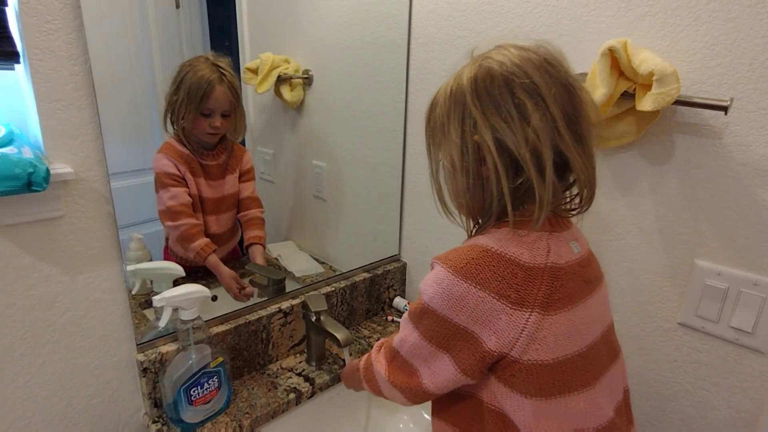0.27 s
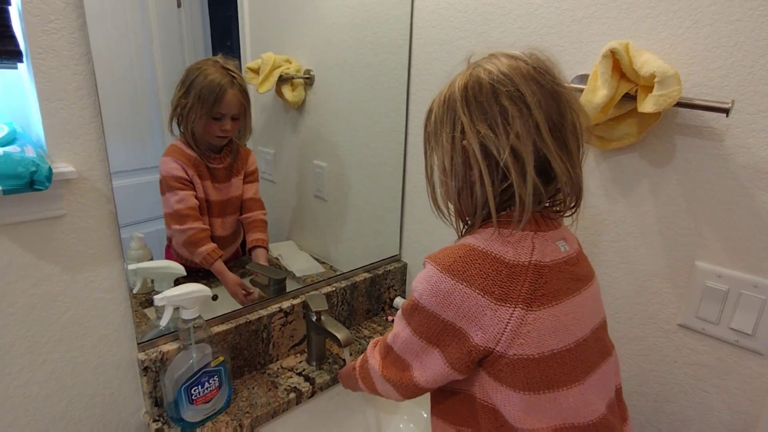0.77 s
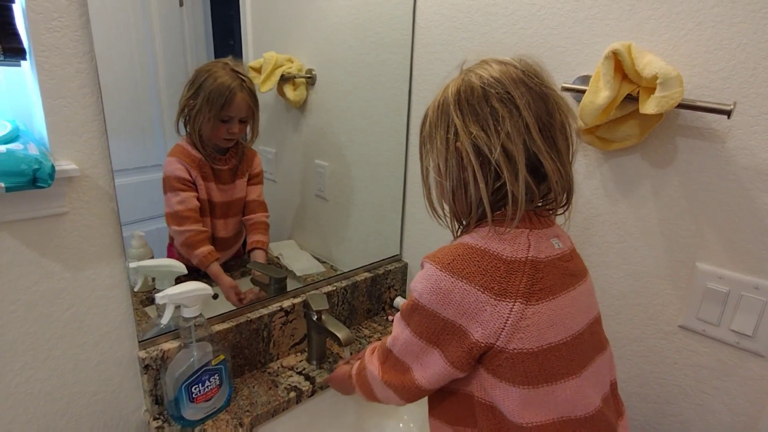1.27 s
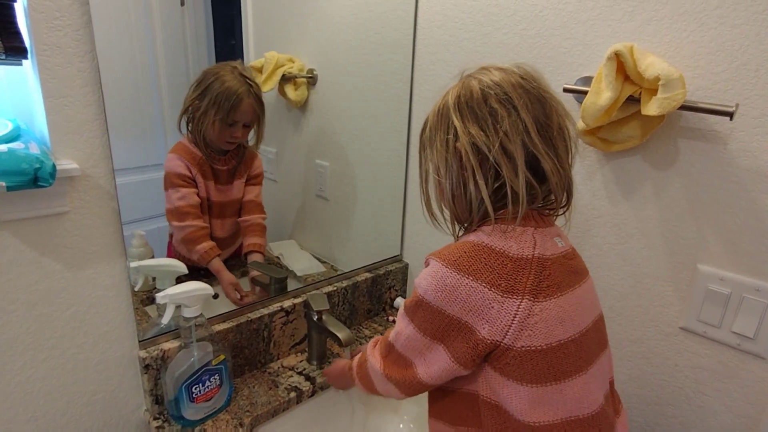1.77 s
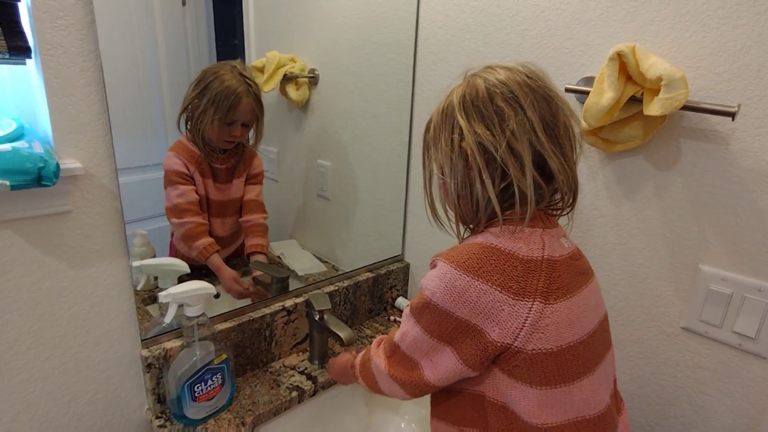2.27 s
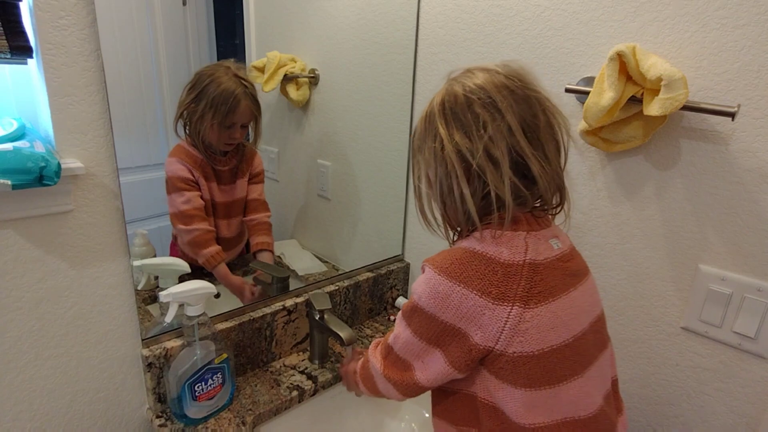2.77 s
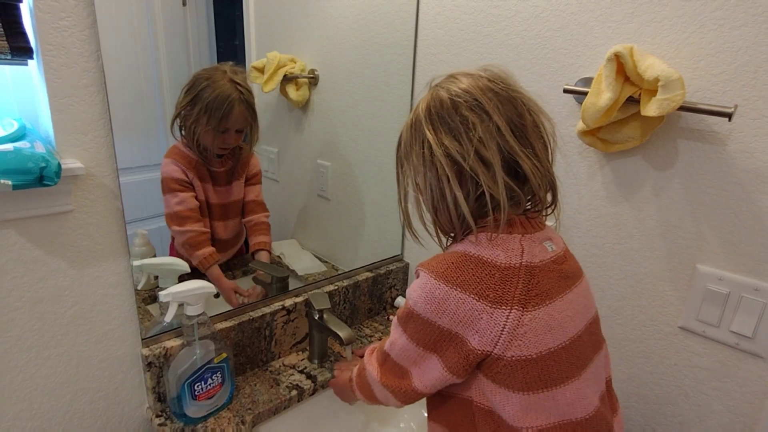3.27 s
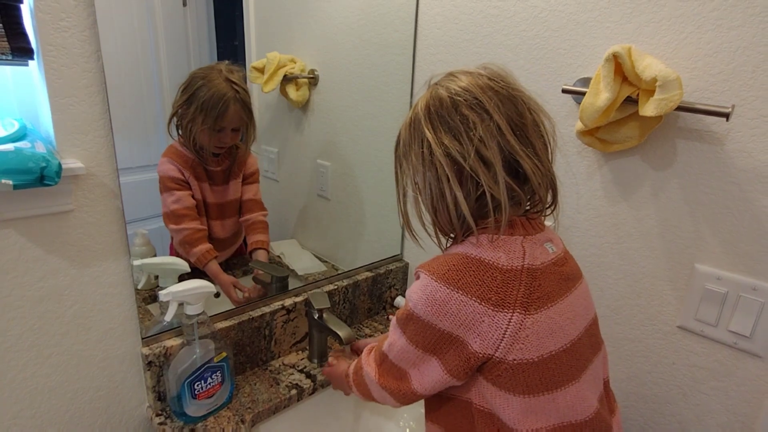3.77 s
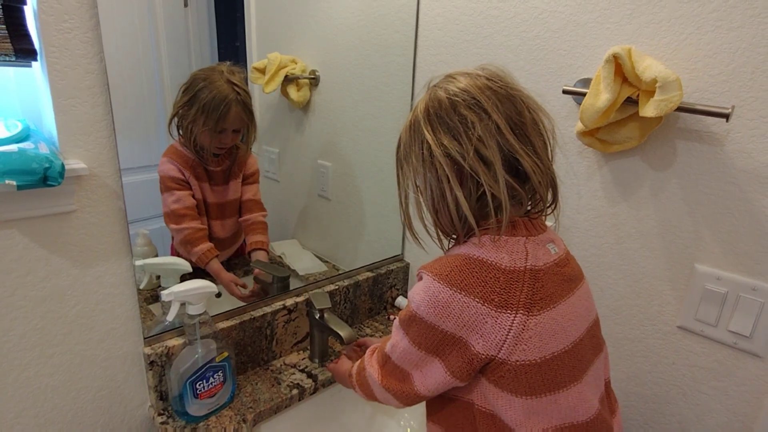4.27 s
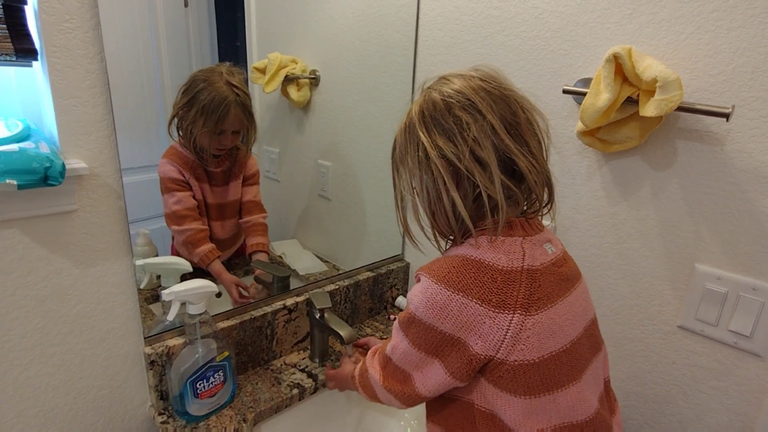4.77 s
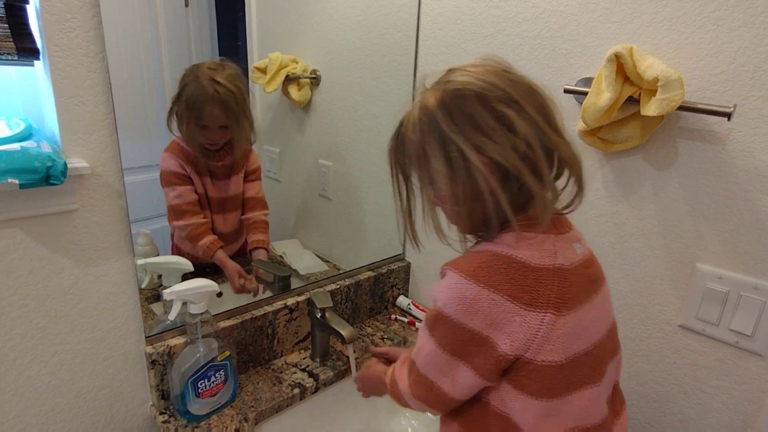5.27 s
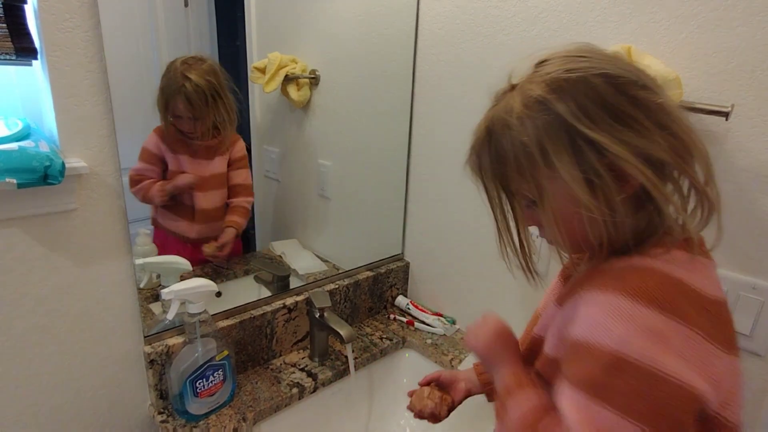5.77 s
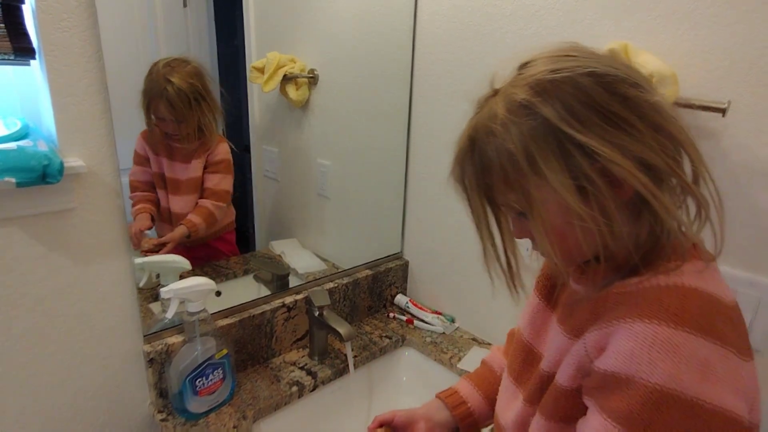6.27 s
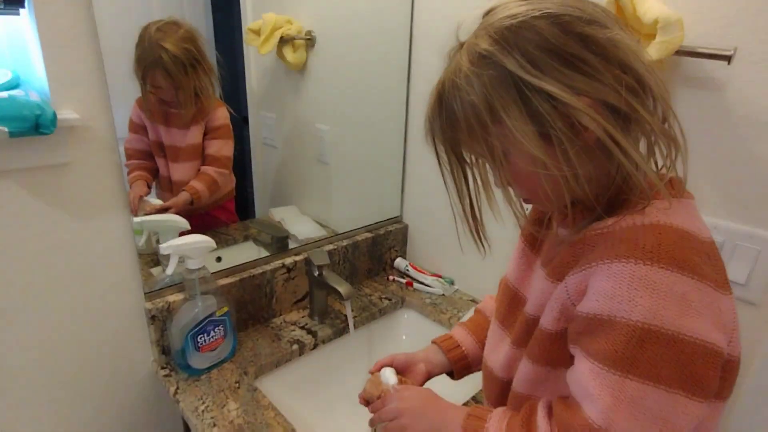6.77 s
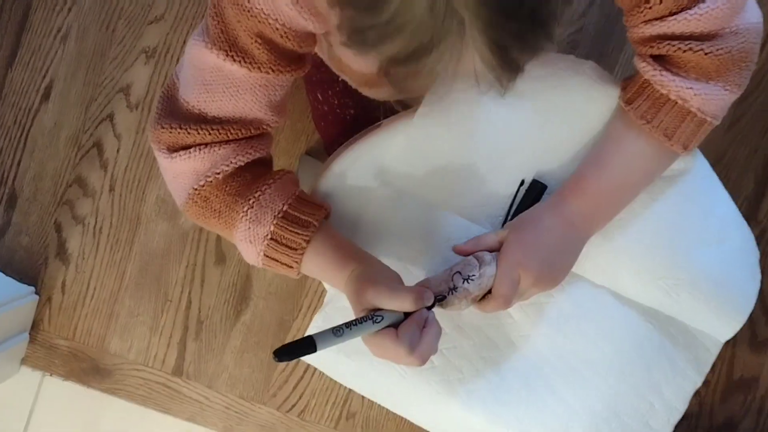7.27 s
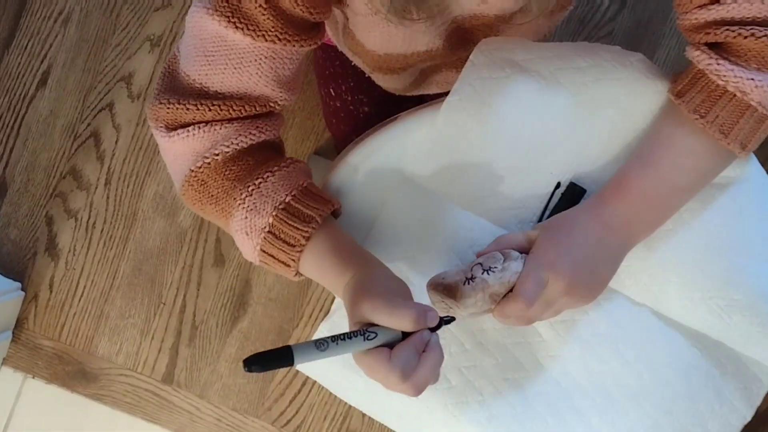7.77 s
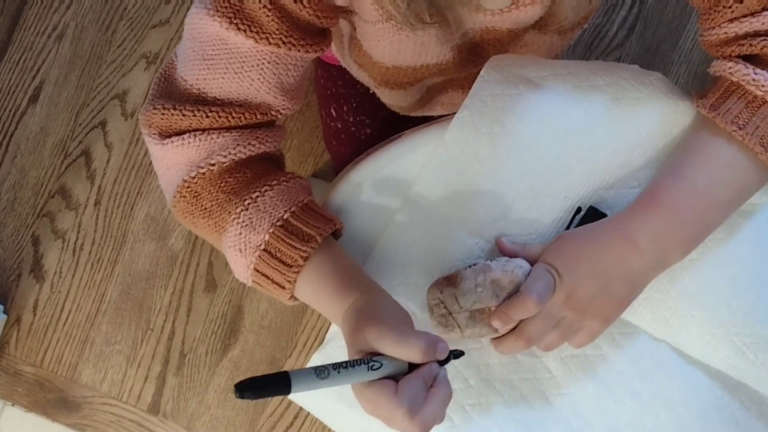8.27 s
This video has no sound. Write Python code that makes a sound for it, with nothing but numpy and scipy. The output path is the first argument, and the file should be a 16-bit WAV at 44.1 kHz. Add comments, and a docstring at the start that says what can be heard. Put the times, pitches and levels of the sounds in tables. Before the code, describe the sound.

From 0 s a bathroom tap runs close by, a fine fizzing jet drumming lightly on the basin. Until about 1.6 s water churns hollow and gurgling in cupped hands, with bubbly splashes near 0.2 and 0.7-0.9 s and dull knocks around 1 s. From 1.6 to 2.7 s it is thinner, with scattered plops; from 2.8 s splashes return, becoming dense and quick from 3.8 to 5.2 s. At about 5.5 s, with a bump, the hands leave and the jet strikes the bare basin: louder, brighter patter, sharp drop ticks and strong splashes, busiest with knocks at 6.3-6.5 s. A final splash and thump come near 7.1 s, where the water breaks off. Silence follows until a dull click at 7.5 s. Then a very quiet room: low mains hum, faint hiss, tiny taps near 7.6-7.85 s and a soft slide around 8.1 s, ending at 8.5 s.

```python
"""In a small bathroom a tap runs while a child rinses something in it. The jet fizzes, spills off the hands
in bubbly splashes and drums on the basin, then hits the bare basin with a bright patter, amid dull knocks.
The sound breaks off; after a silence a click opens onto a quiet room with a mains hum.
Water is built from random impacts, damped rising sine bubbles and shaped noise; the hum is two sines.
Knocks and taps are short dying bursts of shaped noise; each knock adds a dying sine."""
import sys
import numpy as np
from scipy import signal
from scipy.fft import rfft, irfft, next_fast_len
from scipy.io import wavfile
from scipy.ndimage import uniform_filter1d, map_coordinates

SR = 44100
rng = np.random.default_rng(int(sys.argv[2]) if len(sys.argv) > 2 else 0)


def file_out(sig):
    """Save sig as 16-bit WAV at sys.argv[1]."""
    # one column per channel
    cols = np.atleast_2d(sig).T
    # limit, then scale
    lim = np.clip(cols, -1, 1)
    pcm = np.round(lim * 32767).astype(np.int16)
    wavfile.write(sys.argv[1], SR, pcm)


N = 376173
TIME = np.arange(N) / SR  # seconds

# A t60 is the time a sound takes to fall by 60 dB.
# The quiet room's low rumble. Each row: frequency in Hz, strength in dB per Hz.
RUMBLE_SPECTRUM = [(25, -30), (38, -21), (50, -9), (70, 3), (110, -6.5), (200, -5.5), (300, -14),
                   (480, -15.5), (780, -18), (1100, -20), (2000, -33)]
# The faint hiss of its air. Each row: frequency in Hz, strength in dB per Hz.
AIR_SPECTRUM = [(200, -11), (700, -26), (1300, 9), (2200, 10), (4000, 3.5), (6500, -2.5), (10000, -8),
                (15500, -24)]
# How loud the hiss is. Each row: time in seconds, level in dB before the treble is changed.
AIR_LEVEL = [(7.5, -80.5), (7.57, -79.5), (7.63, -75), (7.82, -75.5), (7.95, -78.5), (8.15, -77.5),
             (8.28, -81.5), (8.5, -80.5)]
# How the hiss's treble is raised or lowered. Each row: time in seconds, change in dB.
AIR_TREBLE = [(7.5, 2), (7.7, 5), (8.15, 4), (8.27, -2), (8.5, 2)]
# How loud the mains hum is, before it wavers. Each row: time in seconds, level in dB.
HUM_LEVEL = [(7.5, -76), (7.7, -69), (7.74, -65.5), (8.53, -64.5)]
# Small sounds of handling at the table. Each row: start in seconds, level in dB, brightness in Hz,
# t60 in seconds.
TAPS = [(7.635, -66, 3000, 0.05), (7.723, -53, 130, 0.16), (7.776, -58, 2600, 0.03),
        (7.812, -70, 2500, .06), (7.847, -69, 3000, .03), (8.072, -69, 900, .12), (8.15, -67, 400, .2)]
# Something slides softly over the table. Each row: time in seconds, level in dB.
SLIDE_LEVEL = [(7.98, -95), (8.05, -75.5), (8.1, -77), (8.2, -80), (8.3, -100)]
# The colour of that slide. Each row: frequency in Hz, strength in dB per Hz.
SLIDE_SPECTRUM = [(300, -14), (520, -4), (680, -6), (850, 0), (1150, -5), (1600, -15), (4000, -30)]

# The bathroom walls. Each row: frequency in Hz, t60 of the echo in seconds.
WALLS = [(150, 0.67), (1000, 0.51), (4000, 0.15), (14000, 0.055)]
# How alike left and right are. Each row: frequency in Hz, likeness (1 is the same, 0 is unrelated).
ALIKE = [(60, 0.63), (250, 0.91), (600, 0.7), (900, 0.44), (1300, 0.1), (2000, 0.035), (2800, 0.27),
         (6000, -0.075), (15000, 0.07)]
# How the water leans to one side. Each row: frequency in Hz, left minus right in dB.
LEAN = [(100, 1), (600, 0), (1100, 1), (2000, -3), (3300, -1.5), (4300, 2), (5600, 4.5), (7000, 2),
        (8500, 0), (10500, -1.5), (12000, -0.5), (15000, -2)]

# Bumps against the basin and its cabinet. Each row: start in seconds, level in dB, brightness in Hz,
# t60 in seconds, panel boom level in dB, boom pitch in Hz.
KNOCKS = [(.25, -57, 599.7, .14, -63, 216), (0.791, -64, 150, 0.16, -63, 79.7),
          (0.9694, -48, 850, 0.1, -51, 213.4), (.987, -52, 650, 0.14, -50.5, 382),
          (5.496, -65, 900, 0.046, -58.5, 327), (5.531, -57, 1800, 0.11, -55, 206),
          (6.249, -62, 60, 0.95, -67.5, 60.3), (6.295, -38, 3200, 0.096, -46.5, 403),
          (6.319, -49.5, 1500, 0.18, -64, 62), (6.465, -51.5, 650, 0.19, -56.5, 70),
          (7.077, -43.5, 250, 0.17, -44.5, 177), (7.096, -50, 900, 0.098, -38.5, 172.5)]
# How the cabinet colours a bump. Each row: frequency in Hz, strength in dB.
CABINET = [(30, -35), (70, -23.5), (130, -6.5), (220, -14), (350, -2), (440, -7), (540, -10.5), (650, -6),
           (770, -4.5), (880, -2.5), (1050, -4), (1230, -11.5), (1700, -6.5), (1900, -7.5), (3000, -8.5),
           (8000, -19)]

# Water churning in the cupped hands. Each row: time in seconds, hollow sound in dB before a cut of 3.5 dB,
# its typical pitch in Hz, low gurgle in dB.
HOLLOW = [(0, -71, 995, -68), (.6, -76, 960, -72.5), (.93, -70.5, 930, -66.5), (1.03, -69, 905, -67.5),
          (1.25, -70.5, 825, -63.5), (1.44, -70, 766, -62.5), (1.52, -74.5, 800, -68.5),
          (1.9, -82, 728, -78)]
# Resonances of the low gurgle. Each row: frequency in Hz, width in Hz, strength in dB.
GURGLE_MODES = [(129.6, 4.5, 7), (204, 29, 1), (352.7, 15, 2), (423, 14, -0.5)]

# Handfuls of water that slap into the basin. Each row: start in seconds, reference level in dB,
# typical bubble pitch in Hz, pouring time in seconds, width in octaves (narrow plops, wide smacks).
SPLASHES = [(.227, -42, 2700, .012, 0.27), (.68, -44.5, 2550, .09, 0.41), (.786, -41, 2550, .025, .25),
            (.849, -43.5, 2550, .022, .3), (.913, -51.5, 2750, .018, .5), (1.269, -50, 2660, .09, .4),
            (1.532, -45.5, 3000, .003, 0.18), (1.868, -44, 2510, .007, 0.5),
            (1.888, -48.5, 3100, .003, 0.45), (2.355, -47.5, 3149, .025, 0.36),
            (2.727, -51, 2120, .006, 0.34), (2.81, -50.5, 3400, .015, .6), (2.858, -45, 2150, .01, 0.61),
            (2.875, -46.5, 3400, .012, .5), (2.905, -48, 1880, .004, 0.27), (2.95, -54, 2100, .12, .1),
            (3.092, -43.5, 2800, .012, 0.28), (3.163, -43.5, 3000, .022, .5), (3.23, -48.5, 2120, .005, .2),
            (3.314, -56, 3150, .003, 0.27), (3.401, -48, 3000, .06, .25), (3.75, -53.5, 3370, .004, 0.23),
            (3.777, -51, 2100, .012, 0.22), (3.813, -45.5, 3180, .028, 0.36),
            (3.905, -43.5, 2250, .003, 0.3), (3.954, -40.5, 3150, .006, 0.35),
            (3.983, -44.5, 2800, .005, .8), (4.003, -45, 3600, .012, 0.66), (4.057, -44, 1970, .008, .25),
            (4.113, -48, 3040, .004, 0.52), (4.136, -48.5, 4300, .004, 0.56), (4.15, -47.5, 2550, .03, .6),
            (4.179, -44.5, 3660, .025, 1.1), (4.246, -46.5, 2310, .008, 0.23),
            (4.279, -44, 2100, .01, 0.55), (4.313, -49, 3920, .01, .25), (4.375, -46.5, 2450, .055, 0.56),
            (4.466, -45.5, 2480, .03, 0.34), (4.497, -45, 3390, .006, 0.31),
            (4.517, -43.5, 2150, .022, 0.41), (4.564, -46.5, 3700, .012, 1.1),
            (4.616, -51.5, 1500, .003, .2), (4.643, -45.5, 2800, .017, 0.65),
            (4.69, -45.5, 2130, .006, 0.18), (4.722, -49, 2670, .01, .3), (4.907, -53, 1800, .003, 0.2),
            (4.912, -51.5, 3300, .003, .6), (5.001, -42, 2750, .007, 0.76), (5.058, -46, 3200, .004, 0.72),
            (5.087, -46, 3700, .008, .7), (5.112, -44.5, 3200, .006, 1.1), (5.173, -49.5, 5000, .003, .6),
            (5.205, -44, 3750, .018, 0.35), (5.48, -37, 2600, .004, 0.25), (5.498, -37.5, 3400, .025, 0.57),
            (5.535, -38, 3130, .03, 0.79), (5.585, -39.5, 3600, .012, 0.26), (5.69, -41, 2930, .035, 0.28),
            (5.834, -39.5, 3700, .013, 0.42), (5.955, -45.5, 4300, .01, 0.34),
            (6.094, -39, 3550, .02, 0.38), (6.149, -39, 3700, .02, 0.46), (6.297, -35.5, 3000, .012, 0.46),
            (6.325, -34, 3500, .012, 0.34), (6.338, -36, 4500, .025, 0.69), (6.382, -37.5, 3200, .012, .3),
            (6.41, -40, 3800, .02, .5), (6.464, -38, 3000, .015, 0.32), (6.49, -38, 3200, .025, 0.65),
            (6.573, -39.5, 3203, .02, 0.29), (6.863, -41.5, 3400, .005, .3), (6.908, -38, 4900, .042, .5),
            (7.048, -36.5, 3410, .047, 0.23)]
# Steady run-off from the hands. Each row: time in seconds, level in dB.
SPILL_LEVEL = [(0, -50), (.06, -60), (.35, -60.5), (.9, -58), (1.1, -65.5), (1.7, -67.5), (2.1, -66),
               (2.5, -61.5), (2.69, -66.5), (2.78, -60.5), (3.6, -64), (3.8, -58.5), (3.89, -62), (4, -58),
               (4.18, -57), (4.35, -59), (4.7, -60), (4.85, -62.5), (4.97, -61.5), (5.15, -58.5),
               (5.35, -64.5), (5.55, -56), (7.1, -60)]
# The wet spatter under the bubbles. Each row: frequency in Hz, strength in dB per Hz.
SPATTER_SPECTRUM = [(500, -14.5), (1000, -10), (1600, -9.5), (2150, -2), (2800, -3.5), (3500, 2),
                    (4500, -1), (5500, -3.5), (6700, -10.5), (10000, -37.5)]
# How the basin colours a splash. Each row: frequency in Hz, change in dB.
BOWL = [(900, -11), (1450, 0), (1800, -0.5), (2050, -0.5), (2400, 0), (2750, 1), (3050, -1.5), (3300, 2),
        (3900, 2), (4700, 3), (7000, 5.5)]
# How the cupped hands colour a splash. Each row: frequency in Hz, change in dB.
CUPPED = [(1100, 4), (1750, -12), (2350, 2), (2750, 4), (3400, 1), (4500, 1)]

# Spray thrown by the jet. Each row: time in seconds, amount in dB.
SPRAY = [(0.0, -55.5), (0.79, -54), (1.5, -63.5), (2.39, -64), (2.41, -60), (2.65, -64), (2.73, -62),
         (2.8, -58.5), (2.86, -59), (3.34, -56.5), (3.87, -61), (3.99, -65), (4.19, -62), (4.42, -64.5),
         (4.54, -57), (5.23, -62.5), (5.47, -56.5), (5.51, -54), (6.0, -51), (6.04, -50.5), (7.03, -50),
         (7.09, -50.5)]
# The jet's layers by name. Each entry: dB at the usual spray, dB gained per dB of spray,
# dB gained as the hands leave, dB gained as they draw clear.
JET_LAYERS = {"wash": (-56, 0.32, 5, 2), "patter": (-56.5, 1.67, -0.5, 2), "mist": (-51.5, 1, 1.5, -3)}
# The hands leave the stream. Each row: time in seconds, share of the jet that hits the bare basin.
BARE_SHARE = [(5.3, 0), (5.475, 0.098), (5.5, 0.95)]
# The jet drumming on the basin. Each row: time in seconds, level in dB.
DRUM_LEVEL = [(0, -66), (1.2, -66), (1.6, -65.5), (2.7, -66), (4.2, -65), (5.0, -64), (5.8, -61.5),
              (6.4, -59), (7.1, -60)]
# Basin resonances under the hands. Each row: frequency in Hz, width in Hz, strength in dB.
BASIN_MODES = [(88.5, 41, -9.5), (125, 14.2, -5), (188.5, 11, -1), (236, 45, 0.5), (268.3, 58, 0),
               (347.3, 15, -1.5), (513, 4.5, -4.5), (565.8, 6.7, 1), (557, 216, -13)]
# Basin resonances under the free jet. Each row: frequency in Hz, width in Hz, strength in dB.
BARE_BASIN_MODES = [(92, 32, -10.5), (202.5, 95, -1), (236.4, 59, 6), (260.7, 42, 4), (349.8, 12, 6.5),
                    (425, 11, -9), (494, 25, -9), (580, 60, -9), (910, 63, -28)]
# Standing waves in the empty bowl. Each row: frequency in Hz, width in Hz, strength in dB.
BARE_RING_MODES = [(2150, 90, -4), (2845, 140, 1.5), (3360, 180, -5), (3980, 84, -3), (4180, 64, 2.5),
                   (5440, 91, -12)]
# The wash of the jet on the hands. Each row: frequency in Hz, strength in dB per Hz.
WASH_SPECTRUM = [(200, -16), (900, -12), (1350, -1.5), (2000, -4), (3500, 1.5), (5300, 0.5), (6600, 1.5),
                 (8000, 2.5), (11500, -5.5), (15600, -5.5)]
# The wash on the bare basin. Each row: frequency in Hz, strength in dB per Hz.
BARE_WASH_SPECTRUM = [(200, -34.5), (900, -17), (1500, -17), (2300, -20.5), (3500, 3.5), (4600, -1),
                      (5600, 0), (6700, -8), (8000, 2), (11500, -6.5), (15600, -4)]
# The fine mist. Each row: frequency in Hz, strength in dB per Hz.
MIST_SPECTRUM = [(3000, -30.5), (6500, -16), (8000, -5), (11500, -.5), (12800, -0.5), (14000, 0),
                 (14900, -3.5), (15600, -4.5)]
# The patter at first. Each row: frequency in Hz, strength in dB per Hz.
PATTER_SPECTRUM = [(3000, -37), (6700, -7.5), (7600, 0.5), (8400, 1.5), (9800, 5.5), (10400, 1.5),
                   (11200, -7), (15000, -18.5)]
# The patter on the wet basin. Each row: frequency in Hz, strength in dB per Hz.
WET_PATTER_SPECTRUM = [(3000, -33), (7100, -9.5), (7800, -3.5), (8600, 6.5), (9900, 5.5), (10700, 1.5),
                       (11100, -11), (15000, -26)]
# The jet catches an edge and flicks out droplets. Each row: start in seconds, level in dB.
FLICKS = [(.2, -51), (2.39, -57), (2.51, -60), (3.16, -54), (3.81, -56), (4.19, -59)]
# Single fat drops that tick on the bare basin. Each row: peak time in seconds, level in dB.
TICKS = [(5.752, -41), (5.972, -45), (6.019, -37), (6.103, -41.5), (6.276, -41.5), (6.307, -41.5),
         (6.332, -35.5), (6.417, -34), (6.577, -38.5), (6.712, -43), (6.827, -41), (6.962, -40),
         (7.005, -36)]

BREAK_S, RESUME_S = 7.111, 7.505  # the bathroom breaks off; the quiet room opens
LOW_CUT_HZ, TOP_HZ = 34, 15650
LEFT_LEAD_S = .00008  # the basin lies a little to the left
RUMBLE_DB = -69.5
AIR_SPLIT_HZ = 5100  # where the hiss's treble begins
BOOM_T60 = 0.28  # seconds
RISE_S = 0.0033  # how fast a gush swells
OPENING_START_S, OPENING_END_S = 1.0, 1.6  # the cupped hands open
SPILL_HZ, SPILL_SPREAD = 3045, .25  # bubble pitch of the run-off and its log spread
GUSH_SPREAD, GUSH_T60 = 0.19, 0.15  # a handful's run-off: log spread of pitch, decay in seconds
FROTH_DB, SPATTER_DB = -13, -18  # what follows a handful, against its reference level
CLUMP_DB = 1.4  # how unevenly the run-off leaves the hands
BURST_S, BURST_CLIMB = .028, 0.33  # time a handful's bubbles take, log pitch gained on the way
BURST_SPREAD = 0.19  # log spread of their pitch per octave of width
SLAP_DB, SLAP_T60, SLAP_GRAINS_PER_S = -7, 0.035, 4200  # dB against the reference level, seconds, grain
USUAL_SPRAY_DB = -56.5
FLICK_HOLD_S, FLICK_T60, TICK_T60 = 0.027, 0.044, 0.022  # all in seconds
CLEAR_START_S, CLEAR_END_S = 5.5, 5.85  # the hands draw clear of the basin
WET_S = 5.9  # the patter's colour switches to that of the wet basin
SURGE_S, SURGE_DB, SURGE_T60 = 5.478, -53, 0.48  # the freed jet first lands hard on the basin
BARE_RING_DB = -9.5  # standing waves against the wash


def amp(db):
    """Turn decibels into a gain."""
    return 10 ** (np.asarray(db) / 20)


def unit(x):
    """Scale x to an average (rms) level of 1."""
    return x / np.sqrt(np.mean(x ** 2) + 1e-20)


def along(points, hz):
    """Read a table of (Hz, value) points at any frequency, on a log axis."""
    f, v = np.transpose(points)
    return np.interp(np.log(hz + 1), np.log(f + 1), v)


def curves(rows):
    """Give one value per sample for each column after the time."""
    s, *columns = np.transpose(rows)
    return [np.interp(TIME, s, column) for column in columns]


def level(rows):
    """Turn a table of times and dB into a gain for every sample."""
    return amp(curves(rows)[0])


def wobble(rate):
    """Draw a smooth random curve with `rate` knots a second."""
    knots = rng.standard_normal(int(N * rate / SR) + 4)
    return map_coordinates(knots, [TIME * rate])


def filtered(x, response):
    """Multiply the spectrum of x by a response that depends on frequency."""
    m = next_fast_len(N + SR // 2)
    hz = np.fft.rfftfreq(m, 1 / SR)
    return irfft(rfft(x, m) * response(hz), m)[..., :N]


def coloured(x, spectrum):
    """Shape x by a spectrum, at rms 1."""
    return unit(filtered(x, lambda hz: amp(along(spectrum, hz))))


def ringing(x, modes):
    """Send x through resonances that each ring around one pitch, at rms 1."""
    def response(f):
        total = 0
        for k, (centre, width, db) in enumerate(modes):
            resonance = 1j * f * width / (centre ** 2 - f ** 2 + 1j * f * width)
            total = total + (-1) ** k * amp(db) * resonance  # neighbours take opposite signs
        return total
    return unit(filtered(x, response))


def impacts(rate, size_db):
    """Make two streams of random impacts of uneven size, at rms 1; rate is hits per second."""
    chance = rng.random((2, N))
    sign, size = rng.standard_normal((2, 2, N))
    return unit((chance < rate / SR) * np.sign(sign) * amp(size_db * np.clip(size, -2.5, 2.5)))


def bubbles(s, hz, gain, cycles, rise):
    """A bubble is a damped sine that rises in pitch, with its own phase in each of two streams."""
    t = np.arange(SR // 60) / SR
    age = t * hz[:, None] / cycles
    phase = 2 * np.pi * cycles * (age + rise * (age - 1 + np.exp(-age)))
    body = gain[:, None] * np.exp(-3 * age) * (1 - np.exp(-30 * age))
    at = (np.abs(s[:, None] + t) * SR).astype(int).ravel()
    streams = []
    for offset in rng.uniform(0, 2 * np.pi, (len(s), 2)).T:
        sound = body * np.sin(phase + offset[:, None])
        streams.append(np.bincount(at, sound.ravel(), N)[:N])
    return np.array(streams)


def bathroom(x, wet_db, count=9):
    """Hard walls add a short dense tail, new for each of `count` stretches as the water moves about."""
    hz, t, z = signal.stft(rng.standard_normal((count, 2, SR // 4)), SR, nperseg=256)
    fade = amp(-60 * t / along(WALLS, hz)[:, None])
    tails = signal.istft(z * fade, SR, nperseg=256)[1]
    echo, step = np.zeros((2, N + SR)), N // count + 1
    for k, tail in enumerate(tails):
        stretch = x[:, k * step:(k + 1) * step]
        piece = signal.fftconvolve(stretch, tail / np.linalg.norm(tail[0]), axes=1)
        echo[:, k * step:][:, :piece.shape[1]] += piece
    return (x + amp(wet_db) * echo[:, :N]) / np.hypot(1, amp(wet_db))  # keeps the power about the same


def droplets(rate, size_db, wash_db, wet_db):
    """Single ticks lie over the smooth wash of countless smaller ones, echoed by the walls."""
    smooth = amp(wash_db) * rng.standard_normal((2, N))
    return bathroom(impacts(rate, size_db) + smooth, wet_db, count=6)


def patchy(x, patchy_db):
    """The colour of x shifts from moment to moment as the stream wanders; rms 1."""
    z = signal.stft(x, nperseg=256)[2]
    field = rng.standard_normal(z.shape[1:])
    field = uniform_filter1d(field, size=6, axis=0)  # smooth over frequency
    field = uniform_filter1d(field, size=9, axis=1)  # smooth over time
    return unit(signal.istft(z * amp(patchy_db * unit(field)), nperseg=256)[1][:, :N])


def swell(s, db, hold, t60):
    """Gain of a gush that rises at s, holds and dies away."""
    age = np.maximum(TIME - s, 0)
    fall_db = 60 * np.clip(age - hold, 0, t60 * 2) / t60
    return amp(db - fall_db) * np.minimum(age / RISE_S, 1)


def stereo(x):
    """Two unrelated streams become left and right, as alike at each pitch as the table says."""
    def shares(hz):
        turn = np.arccos(np.clip(along(ALIKE, hz), -1, 1)) / 2
        return np.array([np.cos(turn), np.sin(turn)])
    mid, side = filtered(x, shares)
    return np.array([mid + side, mid - side])


def blows(rows, body):
    """Each blow is a dying shudder of a body; softer contact is duller."""
    out, t = np.zeros((2, N + SR)), np.arange(SR // 2) / SR
    hz = np.fft.rfftfreq(len(t), 1 / SR)
    for s, db, bright_hz, t60 in rows:
        colour = amp(along(body, hz)) / np.hypot(1, (hz / bright_hz) ** 2)
        shudder = unit(irfft(rfft(rng.standard_normal((2, len(t)))) * colour, len(t)))
        envelope = amp(db - 60 * t / t60) * (1 - np.exp(-t / 0.00043))
        out[:, round(s * SR):][:, :len(t)] += envelope * shudder
    return out[:, :N]


def still_air():
    """Still air is a low rumble and a faint hiss, both shaped noise; the hiss's treble varies."""
    rumble = amp(RUMBLE_DB) * coloured(rng.standard_normal((2, N)), RUMBLE_SPECTRUM)
    air = level(AIR_LEVEL) * coloured(rng.standard_normal((2, N)), AIR_SPECTRUM)
    treble = filtered(air, lambda hz: 1 - 1 / (1 + (hz / AIR_SPLIT_HZ) ** 4))
    return rumble + air + (level(AIR_TREBLE) - 1) * treble


def mains_hum():
    """The hum is a 120 Hz sine with a weak octave above; its level wavers."""
    phase = 2 * np.pi * 120 * TIME
    wavering = amp(curves(HUM_LEVEL)[0] + 0.64 * wobble(29))
    return wavering * unit(np.sin(phase) + amp(-17.5) * np.sin(2 * phase))


def handling():
    """Taps at a table are dying shudders; a soft slide is many tiny impacts."""
    slide = level(SLIDE_LEVEL) * coloured(impacts(rate=1300, size_db=5), SLIDE_SPECTRUM)
    table = [(40, -13), (100, 14.0), (1500, -1), (8000, -5)]  # Hz, dB
    return slide + blows(TAPS, table)


def quiet_room():
    """Still air, an unsteady mains hum and faint handling at a table."""
    return stereo(still_air() + handling()) + mains_hum()


def click():
    """One dull click: a sudden push that relaxes."""
    u = np.maximum(TIME - RESUME_S, 0) / 0.0013
    return -amp(-38.5) * (1 - np.exp(-u * 14)) * (1 - u) * np.exp(-u)


def knocks():
    """Bumps shake the basin and set its cabinet booming on dying sines."""
    out = bathroom(blows([row[:4] for row in KNOCKS], CABINET), wet_db=-10.5)
    for s, *_, db, hz in KNOCKS:
        age = np.maximum(TIME - s, 0)
        boom = amp(db - 60 * age / BOOM_T60) * np.sin(2 * np.pi * hz * age)
        out[0] += boom  # the first stream is what left and right share
    return out


def churn(count=450):
    """Larger bubbles sound in the hollow of the hands, whose pitch mostly sinks, over a low gurgle."""
    hollow_db, hollow_hz, gurgle_db = curves(HOLLOW)
    s = rng.random(count) * HOLLOW[-1][0]
    hz = np.interp(s, TIME, hollow_hz) * np.exp(0.12 * rng.standard_normal(count))
    hollow = bubbles(s, hz, rng.random(count), cycles=8.3, rise=0.042)
    hollow = unit(bathroom(hollow, wet_db=-6.5, count=4))
    gurgle = ringing(impacts(rate=1000, size_db=3.5), GURGLE_MODES)
    return amp(hollow_db - 3.5) * hollow + amp(gurgle_db) * gurgle


def spill(count=5000):
    """Water runs off the hands in small bubbles over a wet spatter; handfuls swell it and lend their pitch."""
    runoff = level(SPILL_LEVEL) ** 2  # as power
    gushes, log_pitch = np.zeros(N), np.zeros(N)
    for s, db, hz, pour, _ in SPLASHES:
        power = swell(s, db + FROTH_DB, pour, GUSH_T60) ** 2
        gushes += power
        log_pitch += power * np.log(hz / SPILL_HZ)
    total = runoff + gushes
    s = rng.random(count) * BREAK_S
    pitch = np.clip(rng.standard_normal(count), -2, 2)
    size = np.minimum(rng.exponential(1, count), 2.8)
    spread = np.interp(s, TIME, (runoff * SPILL_SPREAD + gushes * GUSH_SPREAD) / total)
    hz = SPILL_HZ * np.exp(np.interp(s, TIME, log_pitch / total) + spread * pitch)
    froth = unit(bubbles(s, hz, amp(3.5 * size), cycles=15, rise=0.16))
    # run-off carries as much spatter as froth, handfuls carry less
    spatter_power = (runoff + amp(SPATTER_DB - FROTH_DB) ** 2 * gushes) / total
    spatter = np.sqrt(spatter_power) * coloured(impacts(rate=1300, size_db=5), SPATTER_SPECTRUM)
    clumps = amp(CLUMP_DB * wobble(45))
    return np.sqrt(total) * unit(bathroom(clumps * (froth + spatter), wet_db=3.5))


def slaps():
    """Each handful smacks as it lands: a short grainy puff around its bubble pitch."""
    out, t = np.zeros((2, N + SR)), np.arange(SR // 20) / SR
    octave = np.log2(np.fft.rfftfreq(len(t), 1 / SR) + 1)
    for s, db, hz, _, width in SPLASHES:
        colour = np.exp(-((octave - np.log2(hz)) / width) ** 2)
        grains = rng.standard_normal((2, len(t))) * (rng.random(len(t)) < SLAP_GRAINS_PER_S / SR)
        puff = unit(irfft(rfft(grains) * colour, len(t)))
        out[:, round(s * SR):][:, :len(t)] += amp(db + SLAP_DB - 60 * t / SLAP_T60) * puff
    return out[:, :N]


def splashes(count=8):
    """Each handful lands with a smack and a quick burst of bubbles, the first ones largest and strongest."""
    s, db, hz, _, width = np.repeat(SPLASHES, count, axis=0).T
    order = np.tile(np.arange(count) / count, len(SPLASHES))
    late, sharp = rng.standard_normal((2, len(s)))
    delay = BURST_S * order * np.exp(0.22 * late)
    climb = BURST_CLIMB * (order - .25)
    pitch = hz * np.exp(climb + BURST_SPREAD * width * np.clip(sharp, -1.5, 1.5))
    burst = bubbles(s + delay, pitch, amp(db + 0.5 - 34 * order), cycles=13, rise=0.12)
    return bathroom(burst + slaps(), wet_db=-1.0)


def splashing():
    """Run-off and handfuls sound in the bowl, at first through the hollow of the cupped hands."""
    water = filtered(spill() + splashes(), lambda hz: amp(along(BOWL, hz)))
    through_hands = filtered(water, lambda hz: amp(along(CUPPED, hz)))
    cupped = np.interp(TIME, [OPENING_START_S, OPENING_END_S], [1, 0])
    return (1 - cupped) * water + cupped * through_hands


def jet_drum(bare):
    """The jet's impacts make the basin ring; its resonances change as the hands leave."""
    push = impacts(rate=1500, size_db=1.5)
    drum = np.sqrt(1 - bare) * ringing(push, BASIN_MODES) + np.sqrt(bare) * ringing(push, BARE_BASIN_MODES)
    surge = swell(SURGE_S, SURGE_DB, 0, SURGE_T60)
    return np.hypot(level(DRUM_LEVEL), surge) * drum


def jet_wash(bare):
    """Dense droplets make a wash; on the bare basin the bowl's standing waves join in."""
    drops = droplets(rate=5000, size_db=6.5, wash_db=-4.5, wet_db=-3.0)
    bowl = ringing(impacts(rate=3200, size_db=6), BARE_RING_MODES)
    bare_wash = coloured(drops, BARE_WASH_SPECTRUM) + amp(BARE_RING_DB) * bowl
    bare_wash = patchy(bare_wash, patchy_db=2.25)
    return np.sqrt(1 - bare) * coloured(drops, WASH_SPECTRUM) + np.sqrt(bare) * bare_wash


def jet_patter():
    """Sharp droplets patter; at one moment their colour switches to that of a wet basin."""
    beads = droplets(rate=1500, size_db=3.5, wash_db=-8.5, wet_db=-8.0)
    first, wet = coloured(beads, PATTER_SPECTRUM), coloured(beads, WET_PATTER_SPECTRUM)
    return np.where(TIME > WET_S, wet, first)


def jet():
    """The aerated jet drums, washes and throws a mist; on the bare basin its droplets patter sharply."""
    spray_db = curves(SPRAY)[0] - USUAL_SPRAY_DB
    bare = np.clip(curves(BARE_SHARE)[0], 0, 1)
    clear = np.interp(TIME, [CLEAR_START_S, CLEAR_END_S], [0, 1])
    gain = {}
    for name, (db, grows, bare_db, clear_db) in JET_LAYERS.items():
        gain[name] = amp(db + grows * spray_db + bare_db * bare + clear_db * clear)
    flicks = sum(swell(s, db, FLICK_HOLD_S, FLICK_T60) for s, db in FLICKS)
    ticks = sum(swell(s - RISE_S, db, RISE_S, TICK_T60) for s, db in TICKS)
    flutter_db = 1.3 * wobble(40)  # the jet never lands quite evenly
    patter = np.hypot(gain["patter"], flicks + ticks) * amp(flutter_db) * jet_patter()
    mist = coloured(droplets(rate=4100, size_db=4.5, wash_db=-4.5, wet_db=-5.0), MIST_SPECTRUM)
    mist = gain["mist"] * amp(.5 * flutter_db) * mist
    return jet_drum(bare) + gain["wash"] * jet_wash(bare) + patter + mist


def scene():
    """The bathroom, a silence, then the quiet room."""
    water = stereo(knocks() + churn() + splashing() + jet())
    half = np.array([[.5], [-.5]])  # left and right each take half of the lean and the lead

    def to_the_left(hz):
        return amp(half * along(LEAN, hz)) * np.exp(2j * np.pi * hz * half * LEFT_LEAD_S)
    water = filtered(water, to_the_left)
    closing = amp(np.interp(TIME - BREAK_S, [0, .012, .05, .25], [0.5, -38.0, -79.5, -100]))
    opening = np.clip((TIME - RESUME_S) / .005, 0, 1)
    return opening * quiet_room() + click() + closing * water


def record(dry):
    """The microphone sheds the deepest bass; nothing is kept above the band limit."""
    dry = filtered(dry, lambda hz: 1 - 1 / (1 + (hz / LOW_CUT_HZ) ** 4))
    return filtered(dry, lambda hz: 1 / np.hypot(1, (hz / TOP_HZ) ** 150))


dry = scene()
out = record(dry)
file_out(out)
```